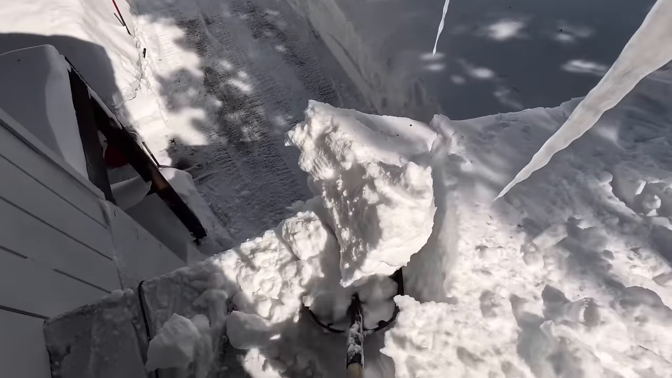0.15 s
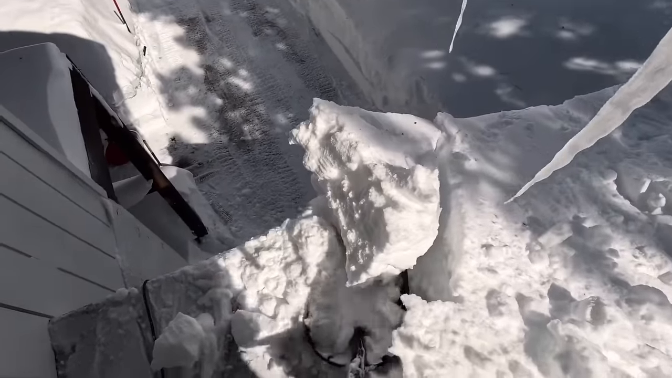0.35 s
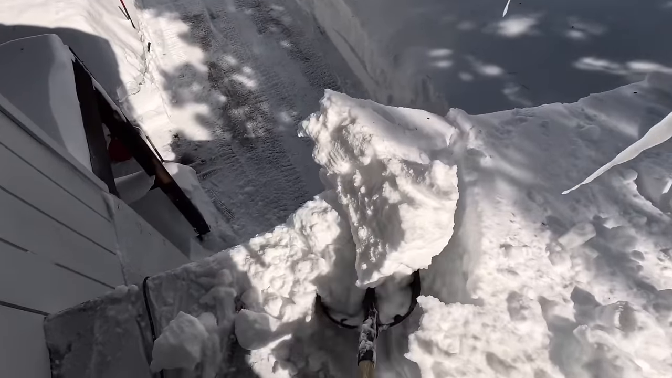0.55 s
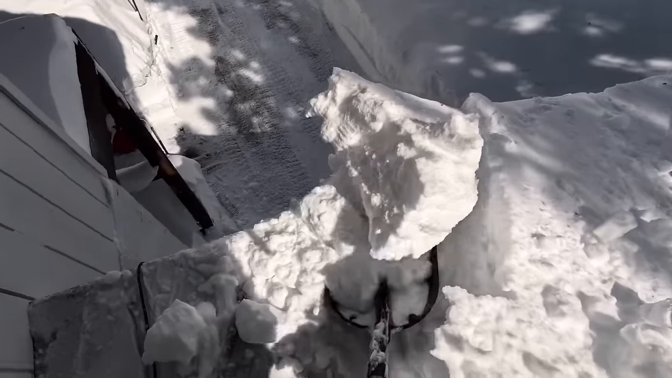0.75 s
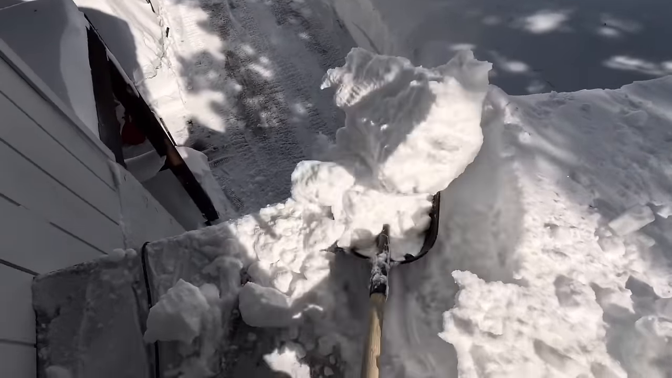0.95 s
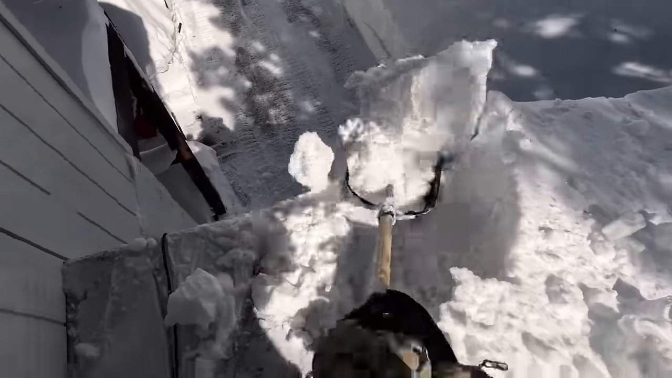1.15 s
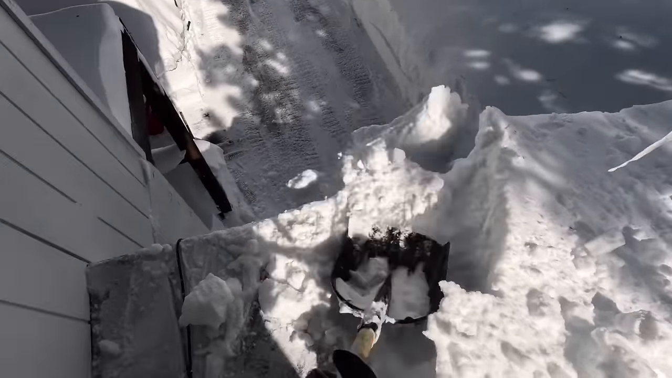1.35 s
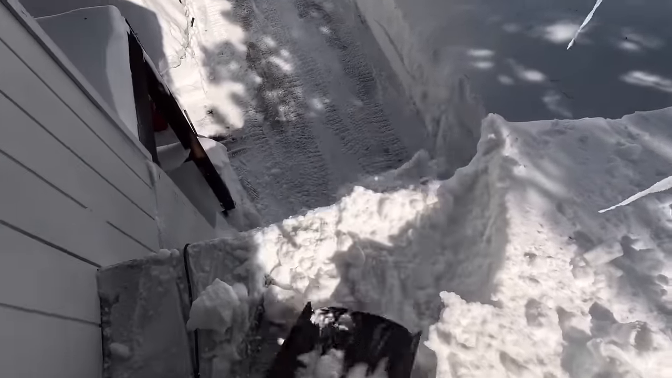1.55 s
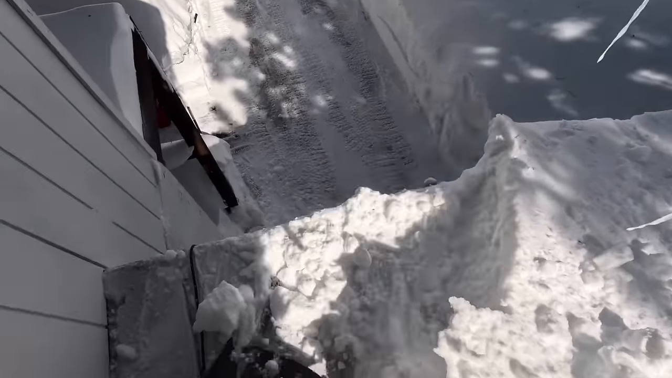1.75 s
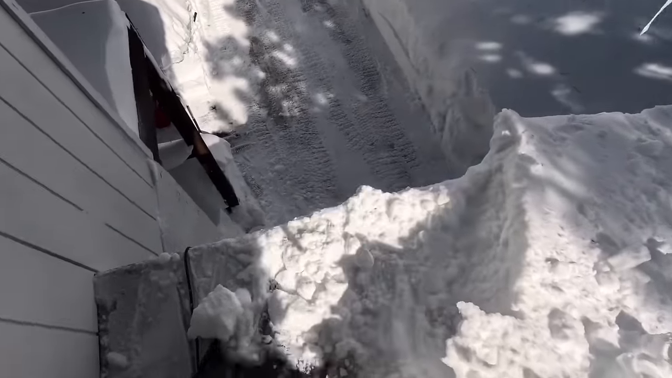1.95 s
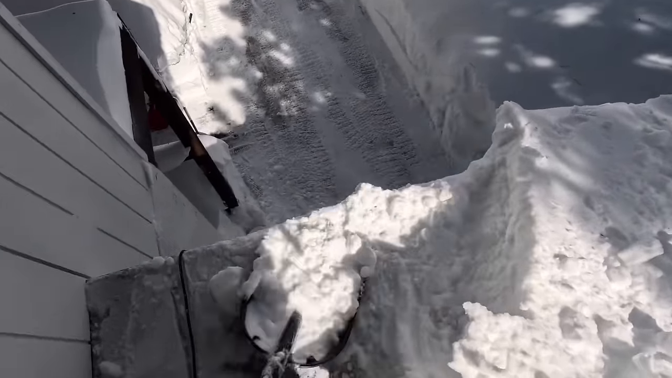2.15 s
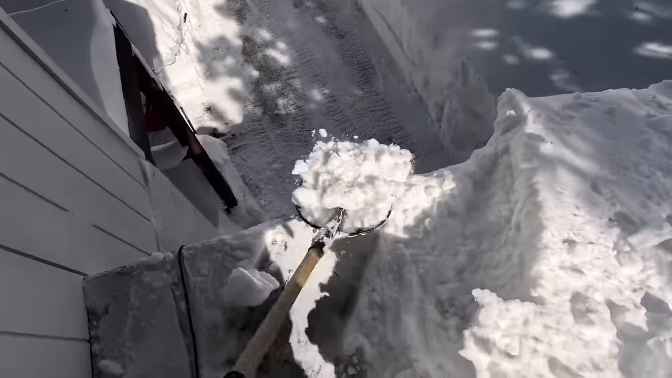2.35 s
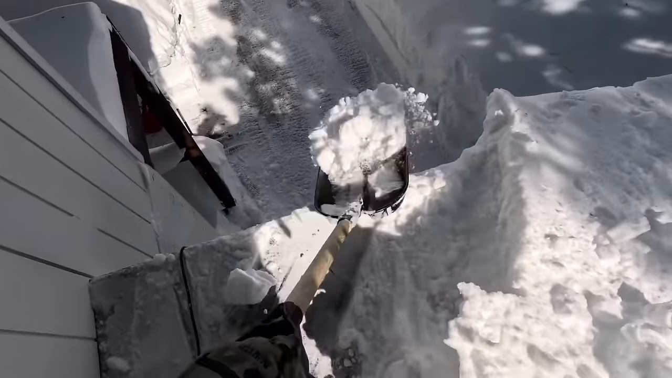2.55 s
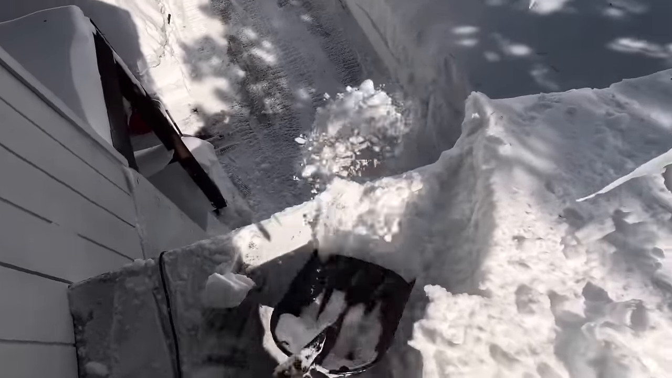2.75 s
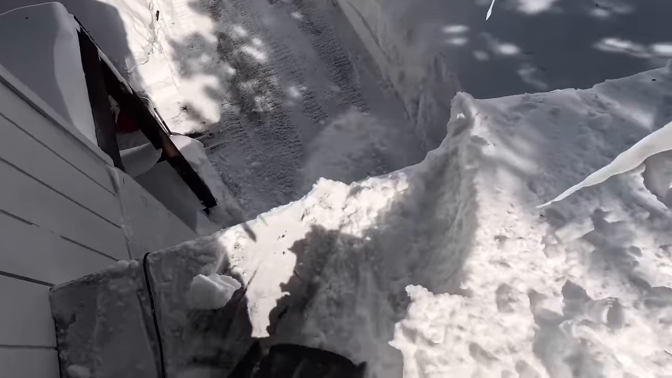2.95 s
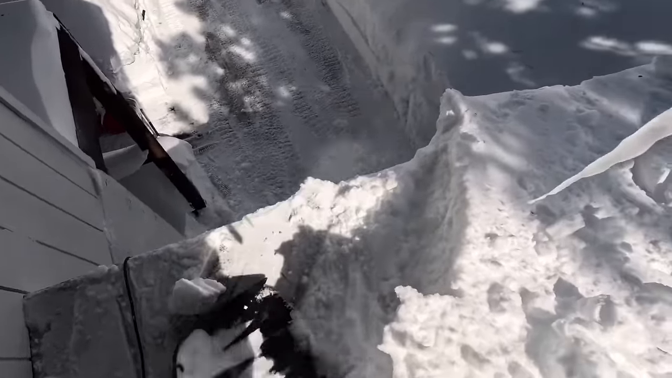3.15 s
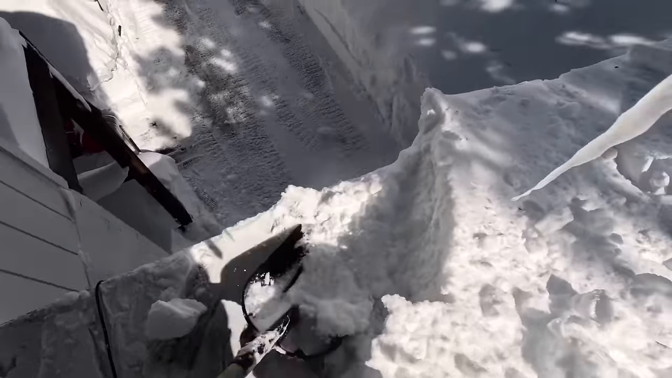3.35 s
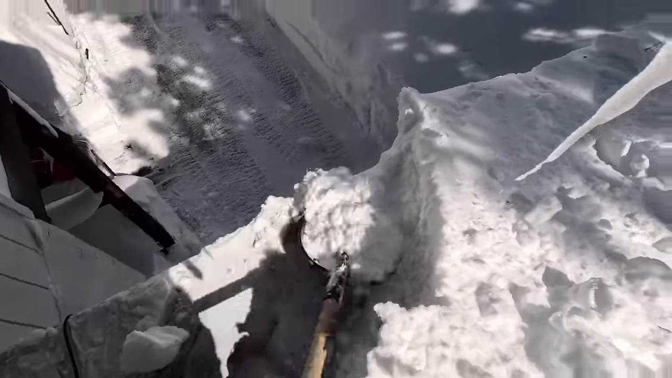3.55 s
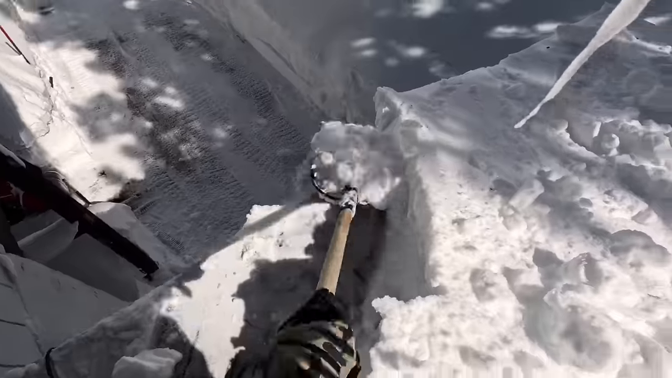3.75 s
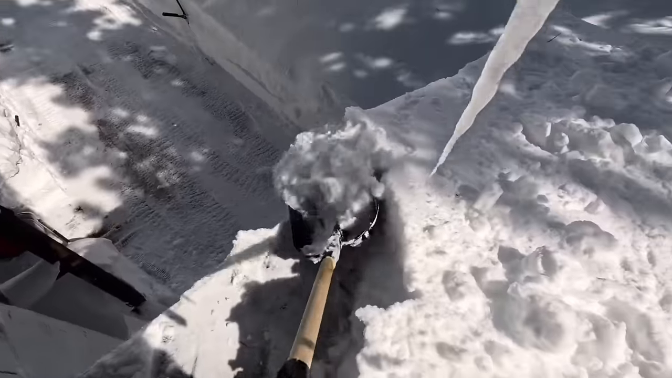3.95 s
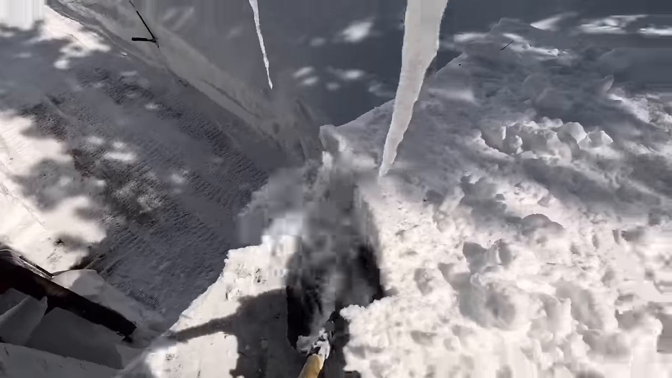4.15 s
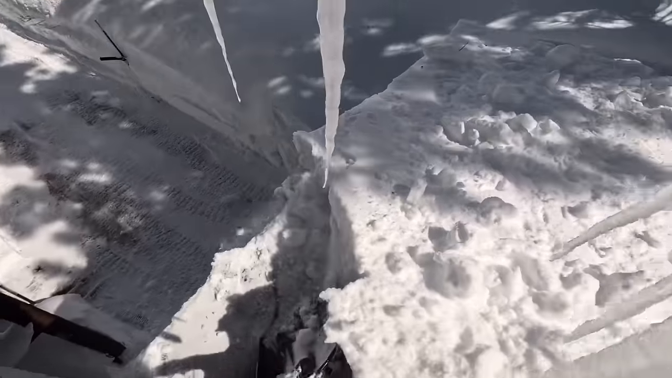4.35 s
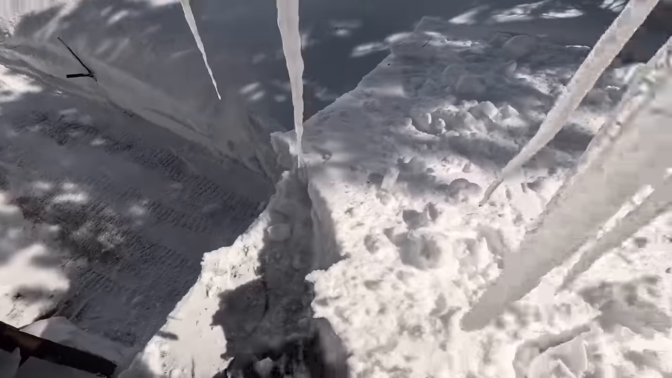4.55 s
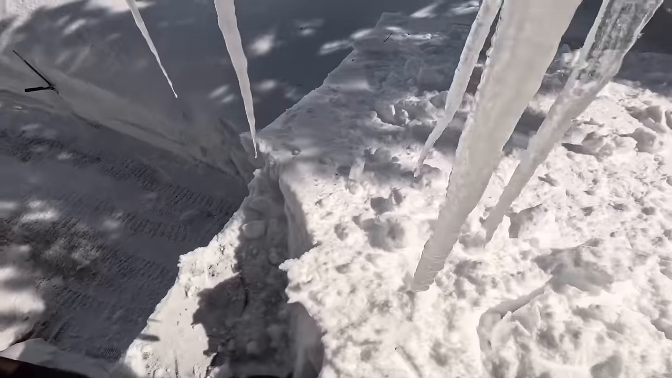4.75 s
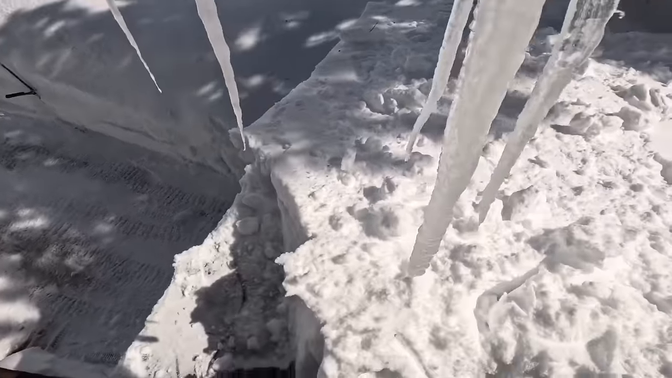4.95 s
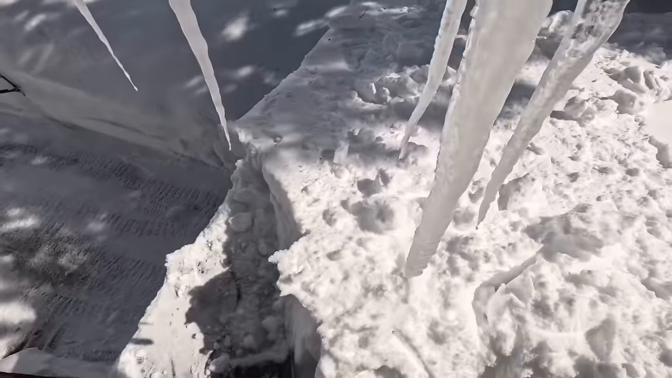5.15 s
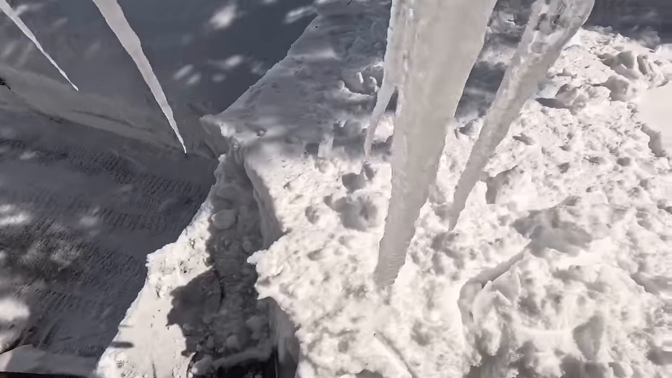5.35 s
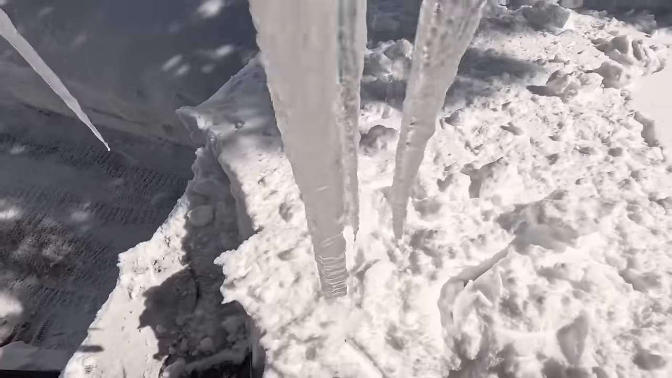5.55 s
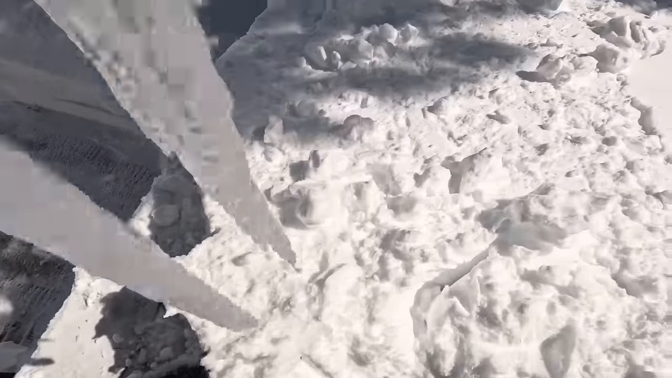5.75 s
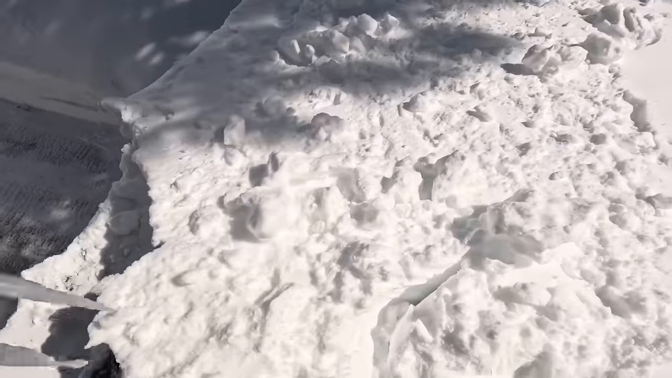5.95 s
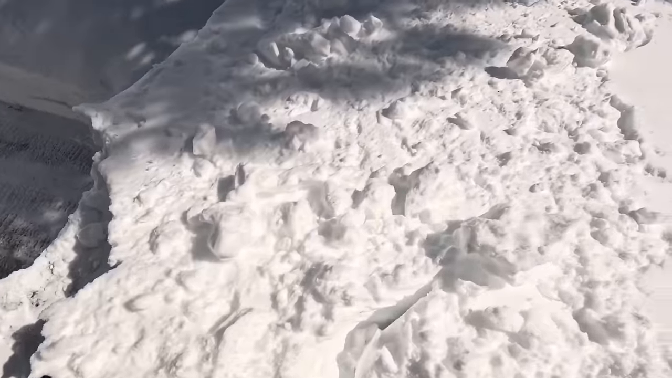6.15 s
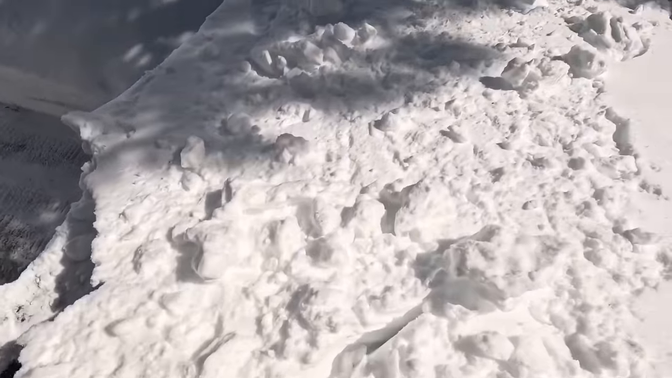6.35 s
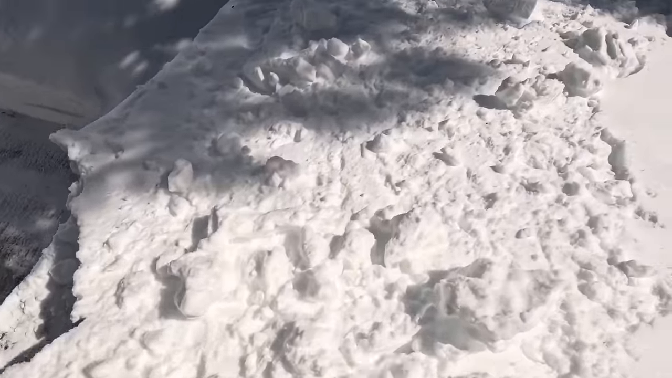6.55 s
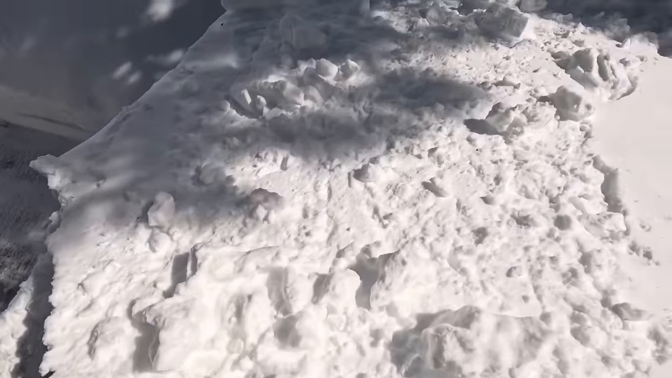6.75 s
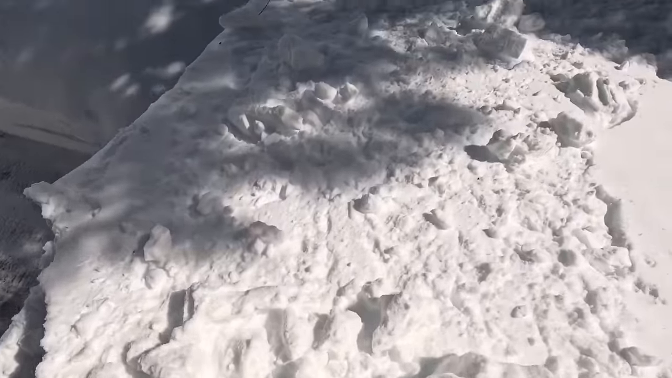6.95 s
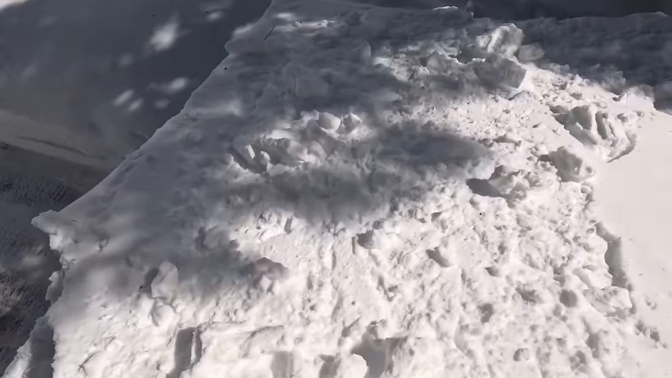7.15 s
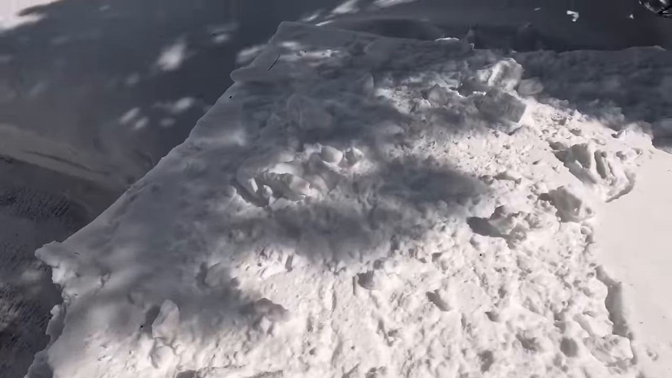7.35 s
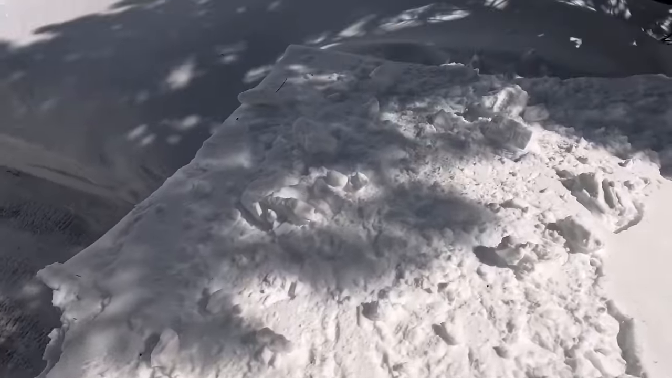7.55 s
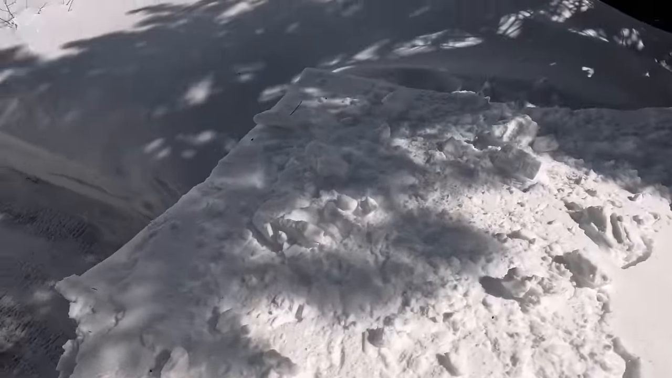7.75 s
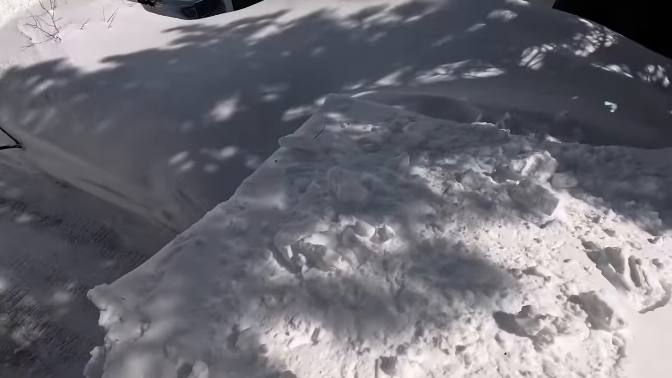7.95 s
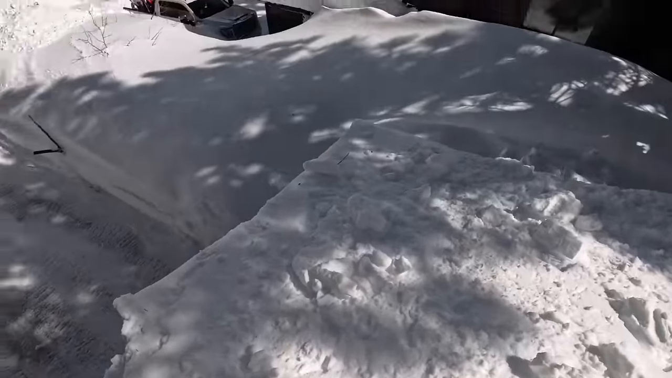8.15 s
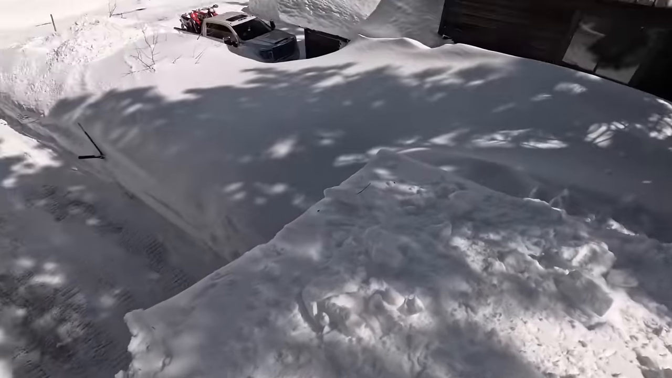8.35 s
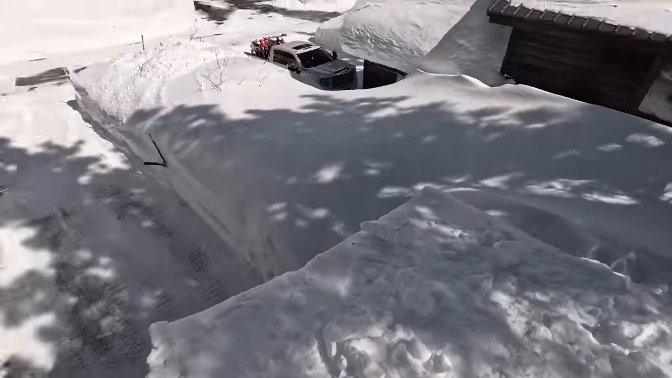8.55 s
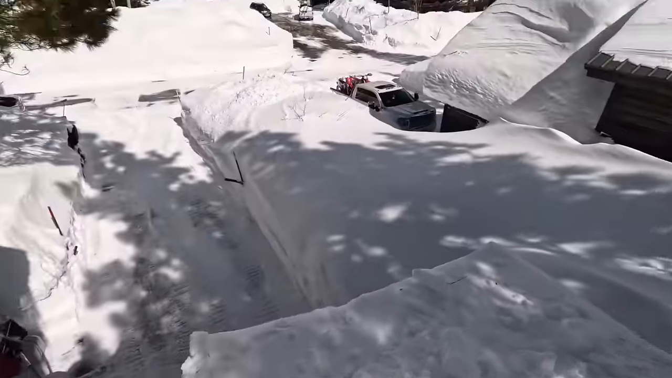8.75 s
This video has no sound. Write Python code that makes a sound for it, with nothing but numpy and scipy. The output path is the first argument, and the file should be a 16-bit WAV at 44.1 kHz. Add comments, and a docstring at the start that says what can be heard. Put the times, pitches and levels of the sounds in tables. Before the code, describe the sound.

Close snow shovelling outdoors: muffled scrapes and thuds, sharp crunches, bright crackling ice, then sparse crunching steps above low wind rumble.

```python
"""Beside a house wall, a shovel bites, scrapes and tips deep dry snow, then boots crunch through the drift.
Ice crystals break as dense sharp grains, coarser lumps rasp on the blade and packed snow thuds:
random trains of brief damped rings, shaped by spectra and modes. Sharp clicks and dry ticks are short bursts.
Filtered noise gives wind and handling rumble on two close microphone ports and far traffic;
a wavering sine gives a faint engine hum."""
import sys
import numpy as np
from scipy import signal
from scipy.fft import rfft, irfft, next_fast_len
from scipy.io import wavfile
from scipy.ndimage import uniform_filter1d, map_coordinates

SR = 44100
rng = np.random.default_rng(int(sys.argv[2]) if len(sys.argv) > 2 else 0)


def pcm_store(signal):
    """Save signal as 16-bit PCM."""
    levels = np.round(np.clip(np.atleast_2d(signal), -1, 1) * 32767)
    wavfile.write(sys.argv[1], SR, levels.astype(np.int16).T)


N = 391608

# modes of the shovel blade: f/Hz, width/Hz, relative level/dB
BLADE_MODES = [(566, 101, -1.5), (965, 430, 1), (1065, 136, 7), (1223, 214, 1.5), (1447, 128, 5),
               (1617, 192, 4), (2290, 1210, -3.5)]
# modes of the hollow between blade and drift: f/Hz, width/Hz, relative level/dB
HOLLOW_MODES = [(181, 44, -2.5), (266, 60.5, 0), (322.6, 77, 3), (483, 138, 0)]


def amp(db):
    """Level to amplitude: 20 dB is a factor of ten."""
    return 10 ** (np.asarray(db) / 20)


def unit(x):
    """Normalisation to an rms value of 1."""
    return x / np.sqrt(np.mean(x ** 2) + 1e-20)


def along(points, hz):
    """Interpolation of (f/Hz, value) points on a logarithmic frequency axis."""
    f, value = np.transpose(points)
    return np.interp(np.log(hz + 1), np.log(f + 1), value)


def curves(rows):
    """Linear interpolation in time: one value per sample for each column after t/s."""
    s, *columns = np.transpose(rows)
    return [np.interp(np.arange(N) / SR, s, column) for column in columns]


def wobble(rate):
    """Slow random modulation: a smooth curve through Gaussian knots, rate of them a second."""
    knots = rng.standard_normal(N // 20)
    return map_coordinates(knots, [np.arange(N) * rate / SR])


def filtered(x, response):
    """Linear filtering: the spectrum is multiplied by a complex response of frequency."""
    m = next_fast_len(N + SR // 2)  # padded so that ringing does not wrap round
    return irfft(rfft(x, m) * response(np.fft.rfftfreq(m, 1 / SR)), m)[..., :N]


def coloured(x, spectrum):
    """Spectral shaping by (f/Hz, level/dB) points, normalised to rms 1."""
    return unit(filtered(x, lambda hz: amp(along(spectrum, hz))))


def resonant(x, modes):
    """Modal summation: parallel second-order resonances of alternating sign, normalised to rms 1."""
    def response(f):
        total = 0
        for k, (centre, width, db) in enumerate(modes):
            mode = 1j * f * width / (centre * centre - f * f + 1j * f * width)
            total = total + (-1) ** k * amp(db) * mode
        return total
    return unit(filtered(x, response))


def shifting(x, patchy_db, turns, size):
    """Time-varying transfer: gain (rms dB) and phase (rms rad) wander in patches of time and frequency."""
    z = signal.stft(x, nperseg=size)[2]
    field = rng.standard_normal((2,) + z.shape)
    field = uniform_filter1d(field, size=2, axis=1)  # smoothed over frequency
    field = unit(uniform_filter1d(field, size=8, axis=2))  # smoothed over time
    changed = z * amp(patchy_db * field[0]) * np.exp(1j * turns * field[1])
    return signal.istft(changed, nperseg=size)[1][:N]


def outdoors():
    """Broadband turbulence and distant sources: lumpy wind rumble, far traffic and a wavering engine hum."""
    # wind on the ports: t/s, rms level/dB before the jolts are added
    wind_level = [(0.0, -39), (0.2, -39), (2.42, -50.5), (2.67, -47.5), (3.19, -52), (3.51, -38),
                  (3.88, -46), (4.57, -44), (4.97, -40), (5.69, -46), (6.18, -41), (7.54, -38), (8.21, -48),
                  (8.88, -34)]
    # far traffic: t/s, rms level/dB
    traffic_level = [(0, -44.5), (1.7, -46), (2.36, -47), (2.8, -44.5), (3.9, -50.5), (5.5, -54.5),
                     (6.6, -46), (7.8, -49), (8.88, -47)]
    # far engine: t/s, level/dB before its wavering
    hum_level = [(0, -49), (1.2, -39), (2.3, -40.5), (2.4, -46), (8.88, -110)]
    # microphone shaken by a move: start t/s, nominal length/s, added rumble level/dB
    jolt_rows = [(0.036, 0.064, -28), (0.51, 0.041, -22), (0.776, 0.19, -33), (0.98, 0.13, -32),
                 (1.073, 0.034, -40), (1.13, 0.041, -31), (1.192, 0.059, -32), (1.468, 0.17, -35),
                 (1.931, 0.14, -23), (2.27, 0.076, -21.5), (2.401, 0.11, -26), (3.473, 0.047, -37),
                 (3.589, 0.029, -35.5), (4.273, 0.03, -32), (4.884, 0.066, -36), (4.998, 0.026, -39),
                 (6.055, 0.062, -33.5), (6.473, 0.048, -31), (7.194, 0.044, -40), (7.559, 0.027, -27)]
    # rumble spectrum: f/Hz, relative level per Hz/dB
    wind_spectrum = [(8.8, -18), (15, -19), (28, 4.5), (75, -3.5), (200, -13), (260, -16), (440, -120)]
    # traffic spectrum: f/Hz, relative level per Hz/dB
    traffic_spectrum = [(59, -7), (100, -10), (300, -0.5), (553, -1), (861, -3.5), (1340, -4),
                        (2320, -12.5), (7580, -23.5), (13100, -37.5), (15500, -35)]

    rumble = coloured(amp(2.3 * wobble(9.6)) * rng.standard_normal(N), wind_spectrum)
    traffic = coloured(amp(1.5 * wobble(6)) * rng.standard_normal(N), traffic_spectrum)
    hum_hz = 75 + 3 * wobble(11)
    hum = np.sin(2 * np.pi * np.cumsum(hum_hz) / SR) * amp(1.8 * wobble(3.6))
    t = np.arange(N) / SR
    jolts = 0
    for s, length, db in jolt_rows:
        jolts = jolts + amp(db) * np.exp(-(2.3 * (t - s - length / 2) / length) ** 2)
    rumble_gain = amp(curves(wind_level)[0]) + jolts
    return rumble_gain * rumble + amp(curves(traffic_level)[0]) * traffic + amp(curves(hum_level)[0]) * hum


def ticks():
    """Impulsive radiation: each thin dry tick is a quickly decaying burst of bright noise."""
    # ticks: t/s, initial level/dB before colouring
    tick_rows = [(4.854, -24), (4.8803, -31), (5.191, -24), (5.247, -28), (5.3537, -34), (5.3757, -45),
                 (5.4026, -41), (5.5468, -47), (5.564, -33), (5.6002, -54), (5.6171, -38), (5.6785, -29),
                 (5.7763, -16), (5.8097, -24), (5.9184, -43), (5.9614, -40), (6.2791, -21), (6.3609, -24),
                 (7.3861, -34), (7.427, -38), (7.5058, -33), (7.6241, -39), (7.7174, -46), (7.9379, -32),
                 (7.9862, -29), (8.1015, -44.5), (8.1364, -34.5), (8.1663, -56), (8.3399, -34)]
    # tick colour: f/Hz, gain/dB
    tick_spectrum = [(1500, -30), (5000, -1), (8000, 9), (12500, -2.5), (15600, -9)]
    out, t = np.zeros(N + SR), np.arange(SR // 200) / SR
    for s, db in tick_rows:
        envelope = amp(db - 60 * t / 0.0037)  # t60 of 3.7 ms
        out[round(s * SR):][:len(t)] += envelope * rng.standard_normal(len(t))
    return filtered(out[:N], lambda hz: amp(along(tick_spectrum, hz)))


def thumps():
    """Heavily damped oscillation: a lump or the landing blade gives soft snow one low push."""
    # lumps and blade landing: t/s, nominal level/dB, f/Hz, t60/s
    thump_rows = [(0.045, -20, 76.4, 0.069), (0.492, -17.5, 163, 0.099), (0.826, -13, 186, 0.094),
                  (1.133, -11.5, 244, 0.07), (1.481, -22, 290, 0.11), (1.991, -11, 190, 0.088),
                  (1.987, -10.5, 60, 0.16), (2.124, -14, 234, 0.17), (2.282, -10, 181, 0.11),
                  (2.4, -22, 60.7, 0.088), (2.881, -22, 304, 0.27), (3.18, -8, 287, 0.12),
                  (3.661, -31, 75.4, 0.16), (4.119, -23, 292, 0.097), (4.266, -23, 157, 0.2),
                  (4.415, -21, 198, 0.068), (4.493, -42, 208, 0.064), (4.707, -23, 205, 0.11),
                  (4.985, -19, 84, 0.11), (6.464, -23, 95, 0.064), (6.887, -18, 161, 0.065)]
    push_s = .008  # time constant of the rise
    out, t = np.zeros(N + SR), np.arange(SR // 4) / SR
    for s, db, hz, t60 in thump_rows:
        shape = amp(-60 * t / max(t60, .01)) * (1 - np.exp(-t / push_s))
        out[round(s * SR):][:len(t)] += amp(db) * shape * np.sin(2 * np.pi * hz * t)
    return out[:N]


def rubbed(rows, knots_per_s):
    """Friction-driven mode: slow random quadrature amplitudes broaden a gliding tone into a fuzzy band."""
    hz, db = curves(rows)
    phase = 2 * np.pi * np.cumsum(hz) / SR
    return amp(db) * (wobble(knots_per_s) * np.cos(phase) + wobble(knots_per_s) * np.sin(phase))


def moving_snow():
    """Excited modes: one of the blade, freed as its load slides off, and a hollow tone as the drift caves in."""
    # rising blade mode: t/s, f/Hz, level/dB of each quadrature part
    slide_track = [(1.12, 1150, -75), (1.19, 1267, -38), (1.26, 1436, -38), (1.34, 1610, -39.5),
                   (1.45, 1660, -52), (1.58, 1730, -55), (1.63, 1630, -76), (2.48, 1640, -81),
                   (2.52, 1610, -56), (2.62, 1590, -70), (2.67, 1685, -44), (2.74, 1650, -50),
                   (2.82, 1646, -80)]
    # hollow of the caving drift: t/s, f/Hz, level/dB of each quadrature part
    cave_track = [(6.14, 268.6, -70), (6.18, 271, -28.5), (6.24, 264.5, -26), (6.29, 267, -29.5),
                  (6.35, 260, -63)]
    return rubbed(slide_track, knots_per_s=140) + rubbed(cave_track, knots_per_s=34)


def clicks(crackle):
    """Transient excitation in short bursts: a bright click with a short noisy spray, and a knock."""
    # sharp clicks, many at the start of a crunch: t/s, level/dB before colouring, relative knock drive/dB, f/Hz
    click_rows = [(0.168, -20.5, -13, 4230), (0.3268, -33, 8, 1650), (0.4461, -28, -11, 1660),
                  (0.4992, -22.5, 9.5, 1510), (0.6796, -26.5, -3, 2000), (0.821, -20.5, 9, 1690),
                  (1.016, -36, 15, 1760), (1.1453, -27, 4.5, 1780), (1.229, -13, -12, 2500),
                  (1.491, -29, -8, 1660), (1.9071, 1, -9.5, 1850), (2.1647, -12, 2, 1670),
                  (2.2545, -19, 0, 1540), (2.2942, -16, 11, 1810), (2.4073, -20, -13, 1500),
                  (2.4788, -28, -1, 1710), (2.8502, -15.5, -27, 4600), (2.8882, -3, -31, 1640),
                  (3.049, -3, -10, 3000), (3.064, -6.5, -11, 3130), (3.156, -13, -16, 1560),
                  (3.438, -16, 7.5, 1820), (3.457, -14, -7, 2380), (3.4776, -19, 9, 1810),
                  (4.119, -13, 3, 4210), (4.436, -13, -32, 2960), (4.493, -9.5, -32, 1630),
                  (4.598, -9, -5, 1520), (4.7066, -8, -29, 1680), (4.863, -18.5, 0, 1610),
                  (5.081, -6.5, -7, 3200), (5.21, -14, -21, 3440), (5.41, -21, -17, 1590),
                  (5.7005, -8.5, -24, 2370), (5.7348, -5.5, -11, 2980), (5.7567, -7.5, -12, 2900),
                  (5.8587, -17.5, -17, 1510), (5.9, -21, -13, 1520), (6.099, -11.5, -28, 4500),
                  (6.2292, -7.5, -32, 3730), (6.9656, -10.5, -15, 2990), (7.1203, -19, -14, 6070),
                  (7.355, -12.5, -38, 3000), (7.5285, -15, -35, 2080), (8.366, -23.5, -14, 2720),
                  (8.4741, -23, -6, 2300), (8.713, -52, 12, 1500), (8.756, -30, 1.5, 1870)]
    lesser_per_s, lesser_db, lesser_body_db, lesser_hz = 9.7, 11, -14, 3930
    spray_t60 = 0.022  # s

    lesser = []  # at random times, following the crackle level, pitched within an octave either way
    for when, luck, tone in rng.random((400, 3))[:round(lesser_per_s * N / SR)]:
        crackle_db = 20 * np.log10(crackle[int(when * N)] + 1e-6)
        level_db = crackle_db + lesser_db + 8 * luck
        lesser.append((when * N / SR, level_db, lesser_body_db, lesser_hz * 2 ** (2 * tone - 1)))

    bright, knocks, t = np.zeros(N + SR), np.zeros(N + SR), np.arange(SR // 16) / SR
    for s, db, body_db, hz in click_rows + lesser:
        spray, push = rng.standard_normal((2, len(t))) * amp(-60 * t / spray_t60)
        click = amp(-60 * t / .005) * np.sin(2 * np.pi * hz * t)
        bright[round(s * SR):][:len(t)] += amp(db) * (click + 0.28 * spray)
        knocks[round(s * SR):][:len(t)] += amp(db + body_db) * push

    def edge(hz):
        """First-order high-pass at 1600 Hz times a spectral contour."""
        contour = along([(100, -24.5), (8000, 3.0), (11000, -12.5), (15600, -40)], hz)
        return 1j * hz / (1600 + 1j * hz) * amp(contour)

    knock_gain = np.std(knocks[:N]) * amp(-3.0)
    return filtered(bright[:N], edge) + knock_gain * resonant(knocks[:N], BLADE_MODES + HOLLOW_MODES[2:])


def slips(rate, fade, rest):
    """Stick-slip: the snow gives way in random jerks, each a sudden rise and a slower exponential fall."""
    jerks = (rng.random(N) < rate / SR) * rng.random(N)
    t = np.arange(SR // 5) / SR
    return rest + unit(np.abs(signal.fftconvolve(jerks, np.exp(-t / fade))[:N]))


def breaks(rate, pitch_hz, cycles, spread_db, hiss, size):
    """Random fracture: few big and many small lumps, each a brief damped ring, over the hiss of tiny ones."""
    when, tone, luck = rng.random((30000, 3))[:round(rate * N / SR)].T[..., None]
    hz = np.clip(pitch_hz * np.exp(1.57 * (tone - .5)), 60, 14000)
    gain = amp(np.minimum(-spread_db * np.log(luck + 1e-9), 15))
    k = np.arange(size)
    decay = np.exp(-k * hz / SR / cycles)  # time constant in cycles of the ring
    ring = gain * decay * np.sin(2 * np.pi * hz * k / SR)
    where = (when * N).astype(int) + k
    grains = np.bincount(where.ravel(), ring.ravel(), N + size)[:N]
    return unit(grains) + hiss * rng.standard_normal(N)


def force():
    """Power summation of crunches: gain of four layers that rise, hold while ebbing, and die away."""
    # crunches of blade or boot: full-force t/s, rise/s, hold/s, t60/s before the ebb,
    # crackle level/dB, then scrape, powder hiss and thud above the crackle/dB
    crunch_rows = [ (0.02, 0.1, 0.025, .1, -51.5, 12, -30, 9.5),
                   (0.149, 0.096, 0.12, 0.4, -44.5, 4.5, -13, 11),
                   (0.325, 0.0089, 0.016, 0.065, -44.5, 11, -26, 4.5),
                   (0.443, 0.011, 0.013, 0.076, -50.5, 11.5, -4, 21),
                   (0.494, 0.0099, 0.054, 0.24, -35.5, 9, -14, 13),
                   (0.673, 0.068, 0.12, .2, -58, 12, -34, 18),
                   (0.786, 0.0037, 0.015, .05, -49, 17, -20, 26),
                   (0.816, .003, 0.041, 0.17, -38.5, 11.5, -18, 14.5),
                   (0.954, 0.13, 0.072, 0.25, -35.5, 7.5, -15, 10.5),
                   (1.124, 0.025, .01, .04, -42, 7.5, -22, 6),
                   (1.144, .003, 0.014, 0.072, -40.5, 11, -22, 12),
                   (1.213, 0.12, 0.026, 0.055, -34.5, 4, -11.5, -0.5),
                   (1.272, 0.049, 0.21, 0.13, -40.5, 3, -10, -0.5),
                   (1.49, .004, 0.0094, 0.065, -30.5, 3.5, -20, 0.5),
                   (1.537, .015, 0.024, .1, -38, 0, -13, -3),
                   (1.91, 0.0096, 0.082, 0.056, -25.5, 2.5, 2.5, 0.5),
                   (2.015, 0.018, 0.051, 0.15, -24.5, 5, -4, 4.5),
                   (2.106, 0.045, 0.046, 0.046, -24.5, 4, -15, -4),
                   (2.162, 0.0033, 0.013, 0.41, -29.5, 5, -20, 6),
                   (2.251, 0.0053, 0.028, 0.036, -28.5, 12, -36, -7),
                   (2.291, .002, 0.0066, .12, -31.5, 15.5, -14, 13.5),
                   (2.407, 0.0016, 0.015, 0.088, -37.5, 11, -23, 11.5),
                   (2.476, 0.0052, 0.012, 0.041, -34.5, 10.5, -28, 3),
                   (2.622, 0.3, 0.07, 0.19, -51.5, 5.5, -4.5, -18),
                   (2.852, .004, 0.014, 0.059, -39.5, -15, -3, -12),
                   (2.893, 0.012, 0.025, 0.11, -22.5, 0.5, -7.5, -3.5),
                   (2.968, .02, 0.067, .05, -47, -2, -4, 3), (3.044, 0.0035, .04, 0.45, -27.5, 3, -9, -4.5),
                   (3.16, .003, 0.022, 0.054, -34.5, 6, 1, 2),
                   (3.184, 0.018, .04, 0.071, -26, 6.5, -2.5, 5),
                   (3.23, 0.035, 0.051, 0.068, -22.5, 2.5, -8, -2.5),
                   (3.298, .01, 0.098, 0.15, -22, 3.5, -14.5, -0.5),
                   (3.438, 0.0044, 0.054, 0.091, -26.5, 2.5, -18, 0.5),
                   (3.477, 0.013, 0.053, 0.46, -33.5, 10, -12, 6),
                   (3.7, 0.14, 0.073, 0.38, -55, 4.5, -8, 9), (4.035, 0.19, 0.029, 0.24, -39, -3.5, -7, -6),
                   (4.131, 0.017, 0.069, 0.11, -19.5, -5.5, -17.5, -9),
                   (4.235, 0.019, 0.031, 0.049, -22.5, -5, -13, -5.5),
                   (4.292, 0.038, 0.052, 0.13, -23, -3, -11.5, -1.5),
                   (4.429, 0.025, 0.011, 0.12, -29, -6.5, -10, -3),
                   (4.486, 0.012, 0.056, 0.24, -30.5, 0.5, -10, -1),
                   (4.591, 0.0087, 0.032, 0.21, -26.5, -2.5, -13.5, -4.5),
                   (4.711, 0.012, 0.057, 0.36, -33, 2, -1.5, 2.5),
                   (4.878, 0.014, 0.061, 0.042, -40, 3.5, 3.5, -2),
                   (4.973, 0.028, 0.086, 0.05, -38, 6, 5.5, 2),
                   (5.073, 0.0063, 0.017, 0.3, -36, -1, -5, -3.5),
                   (5.144, .01, 0.017, 0.059, -37.5, 0.5, -10, -4),
                   (5.188, 0.014, 0.063, 0.24, -32.5, -1.5, -9, -3.5),
                   (5.397, 0.12, 0.016, 0.44, -47.5, -1.5, -13, 2),
                   (5.555, 0.018, 0.1, 0.11, -51.5, 0.5, -5, 1),
                   (5.699, 0.024, 0.13, 0.039, -34, -1.5, -8.5, -4),
                   (5.828, 0.015, 0.048, 0.29, -42.5, 0, -9.5, -6),
                   (6.033, 0.099, 0.077, .05, -38, -25, -27, -4),
                   (6.112, 0.066, 0.097, 0.077, -30.5, -12, -19, -14),
                   (6.197, 0.034, 0.053, .08, -27.5, -11, -12, -5),
                   (6.273, .02, 0.018, 0.42, -32.5, -2, -5, 2.5),
                   (6.6, 0.14, 0.045, 0.3, -50, 2.5, -10, 6.5),
                   (6.833, 0.053, 0.11, 0.13, -41.5, -1, -9.5, 2),
                   (6.993, 0.043, 0.023, 0.26, -42, 0, -11, 0.5), (7.212, 0.23, 0.2, .1, -53, -4, -7, 6),
                   (7.356, 0.04, 0.071, 0.16, -33.5, -2, -26, -2.5),
                   (7.503, 0.11, 0.11, 0.24, -45, 2, -2.5, 6), (7.82, 0.057, 0.14, .1, -60.5, -13, 1.5, -6),
                   (7.931, .03, 0.095, .1, -50.5, -12, -13, -7),
                   (8.324, 0.27, 0.16, 0.027, -50, 3, -6, 0.5), (8.584, 0.098, 0.06, 0.092, -68, 4, -6, 14),
                   (8.757, 0.0048, 0.041, .1, -45, 5, -16, 3.5),
                   (8.83, 0.025, 0.027, .1, -47.5, 6, -18, 5.5)]
    # ebb from full force onward: crackle, scrape, powder, thud (each dB/s)
    ebb_rates = (11.5, 14.5, 20.4, 12.6)
    rise_db = 16  # climbed in each rise time; the onset spans three
    power = np.zeros((4, N))
    for s, rise, hold, t60, db, *above in crunch_rows:
        first = max(round((s - 3 * rise) * SR), 0)
        t = np.arange(first, min(round((s + hold + 2 * t60) * SR), N)) / SR - s
        shape_db = rise_db * np.minimum(t / rise, 0) - 60 * np.maximum(t - hold, 0) / t60
        ebb_db = np.outer(ebb_rates, np.maximum(t, 0))
        layer_db = db + np.array([0, *above])[:, None]
        power[:, first:first + len(t)] += amp(layer_db + shape_db - ebb_db) ** 2
    return np.sqrt(power)


def crushing(gain):
    """Granular fracture: a stroke breaks fine crystals, rasps coarse ones on the blade and packs the drift."""
    # crystal crackle: f/Hz, relative level per Hz/dB
    crystal_spectrum = [(1060, -8.5), (1800, -4), (2450, -3.5), (2960, -2.5), (3960, -5), (4720, -4),
                        (8250, -9), (9000, -15), (11700, -24), (19800, -120)]
    # powder hiss: f/Hz, relative level per Hz/dB
    powder_spectrum = [(5290, -17), (9000, -5.5), (11000, -15), (12300, -12), (14300, -18), (15500, -33)]
    give = slips(90, fade=0.014, rest=2.8)  # the same jerks drive every band
    fine = breaks(2500, 5240, cycles=0.38, spread_db=4.5, hiss=1.0, size=60)
    coarse = breaks(1100, 1200, cycles=.9, spread_db=3.5, hiss=.4, size=250)
    lumps = breaks(400, 320, cycles=1, spread_db=3, hiss=.2, size=700)
    fine = give * amp(1.26 * wobble(150)) * fine
    coarse = give * amp(1.5 * wobble(90)) * coarse
    lumps = give * amp(1.2 * wobble(40)) * lumps

    fine = shifting(fine, patchy_db=3.0, turns=0, size=384)
    crackle = coloured(fine, crystal_spectrum)
    scrape = resonant(shifting(coarse, patchy_db=2.6, turns=0, size=640), BLADE_MODES)
    powder = coloured(fine, powder_spectrum)
    thud = resonant(shifting(lumps, patchy_db=2, turns=0, size=1280), HOLLOW_MODES)
    return np.sum(gain * [crackle, scrape, powder, thud], axis=0)


def ports(x, pan_db):
    """Partial coherence: both ports share the direct sound; wall and drift scatter has opposite sign."""
    # coherence of the ports: f/Hz, left-right likeness (0 to 1)
    likeness = [(60, 0.88), (100, 1), (180, 0.98), (310, 0.98), (550, 0.91), (950, 0.73), (1650, 0.76),
                (2860, 0.64), (4970, 1), (8640, 0.87), (15000, 0.038)]
    # level difference: f/Hz, left minus right/dB
    level_tilt = [(60, -0.5), (120, -0.5), (240, 1), (480, 1.5), (950, 2.5), (1890, 3), (3770, 1.5),
                  (7520, 1.5), (15000, 9)]
    # phase difference: f/Hz, left lead/rad
    phase_lead = [(300, 0), (1000, -.2), (2580, -.5), (4820, 0), (15000, .1)]
    scatter = shifting(x, patchy_db=0, turns=3, size=256)

    def split(hz):
        """Shares of direct and scattered sound: likeness is the cosine of twice the angle."""
        angle = np.arccos(np.clip(along(likeness, hz), 0, 1)) / 2
        return np.array([np.cos(angle), np.sin(angle)])

    mid, side = filtered(np.array([x, scatter]), split)
    half = np.array([[.5], [-.5]])  # each difference is shared equally by left and right
    pair = np.array([mid + side, mid - side]) * amp(half * pan_db)
    return filtered(pair, lambda hz: amp(half * along(level_tilt, hz)) * np.exp(1j * half * along(phase_lead, hz)))


def scene():
    """Superposition: snow close by, the street far off."""
    # bearing of the snow sound: t/s, left minus right/dB before its mean is removed
    bearing = [(0.0, -4), (2.35, -4), (3.78, -3.5), (3.98, -4.5), (4.55, -2.5), (6.45, -2.5), (6.58, -5),
               (7.32, -1.5), (8.19, -2.5), (8.41, 1.5), (8.88, 0)]
    pan_db, gain = curves(bearing)[0], force()
    snow = crushing(gain) + moving_snow() + clicks(gain[0]) + ticks() + thumps()
    return ports(snow, pan_db - pan_db.mean()) + ports(outdoors(), np.zeros(N))


def record(dry):
    """Soft saturation and band limiting: the input stage rounds tall peaks and the microphones fade at the top."""
    rounded = dry / (1 + np.abs(dry / .85) ** 4) ** (1 / 4)

    def response(hz):
        """A steady -2.5 dB up to 13 kHz, then a fall; nothing outside 10 to 15680 Hz."""
        fade_db = along([(13000, -2.5), (14500, -9), (15600, -13)], hz)
        return amp(fade_db) * (hz > 10) * (hz < 15680)

    return filtered(rounded, response)


dry = scene()
out = record(dry)
pcm_store(out)
```